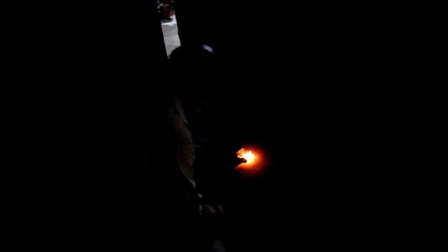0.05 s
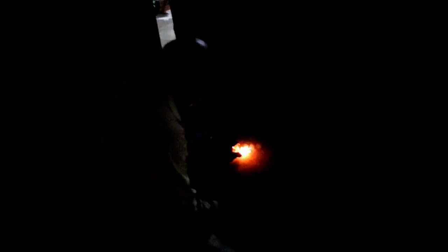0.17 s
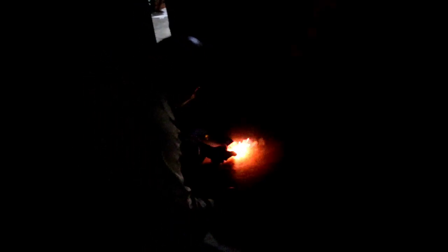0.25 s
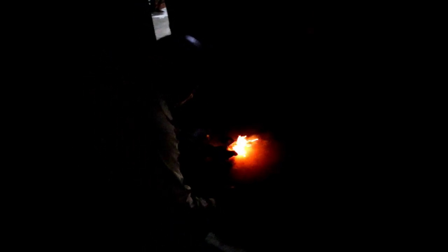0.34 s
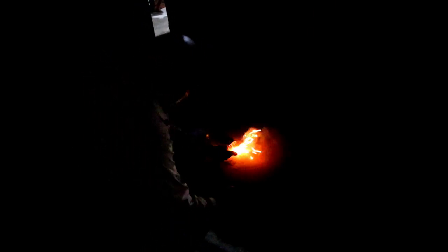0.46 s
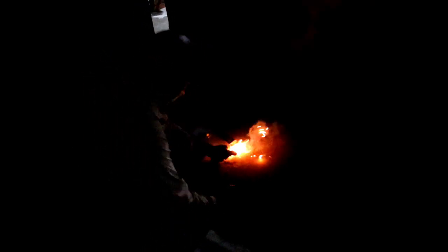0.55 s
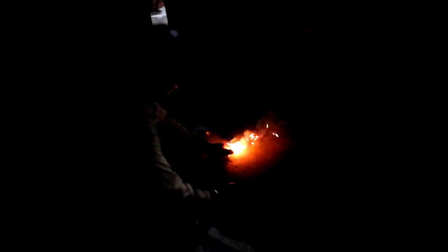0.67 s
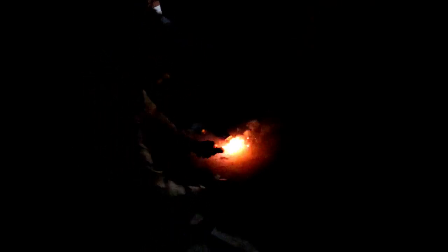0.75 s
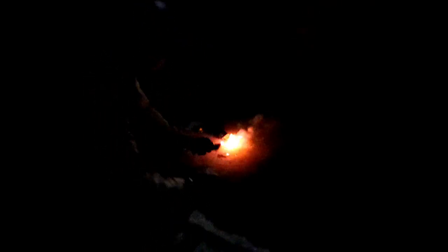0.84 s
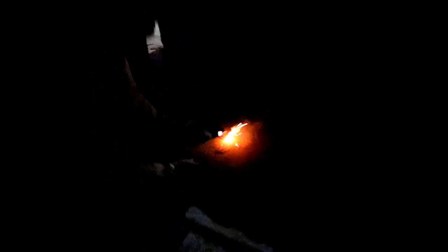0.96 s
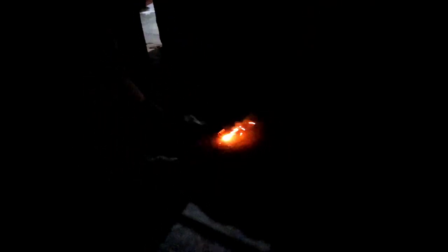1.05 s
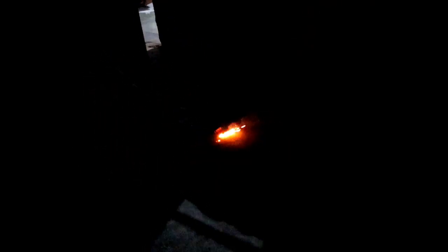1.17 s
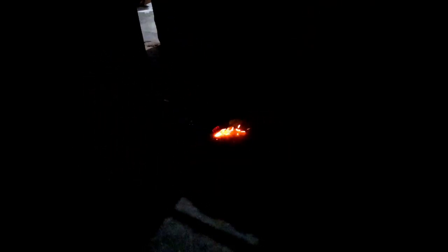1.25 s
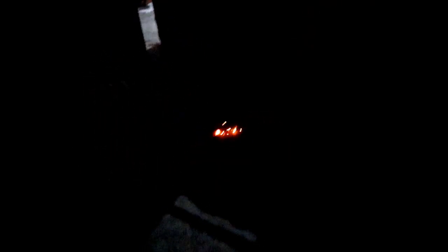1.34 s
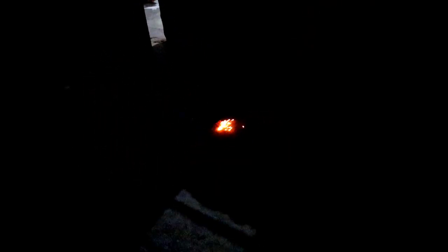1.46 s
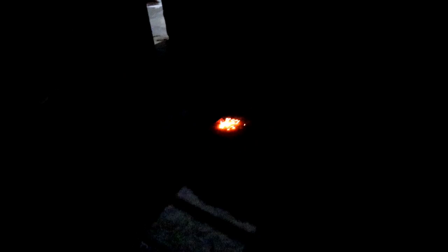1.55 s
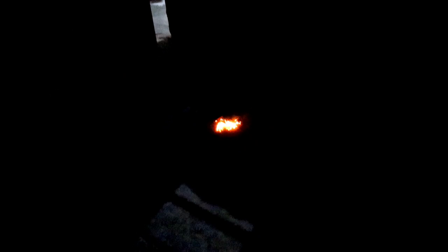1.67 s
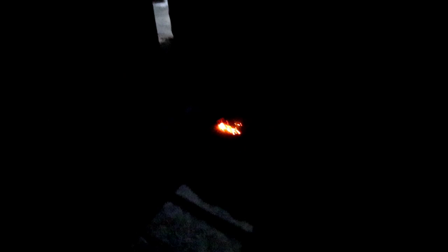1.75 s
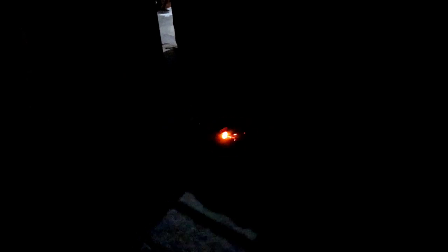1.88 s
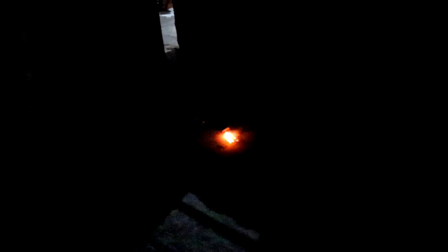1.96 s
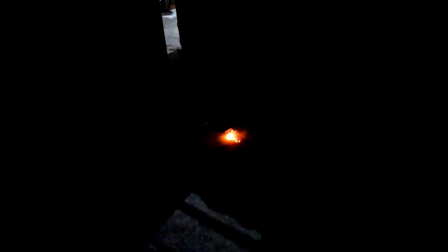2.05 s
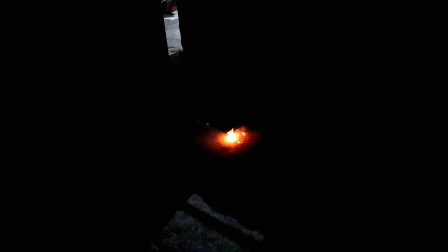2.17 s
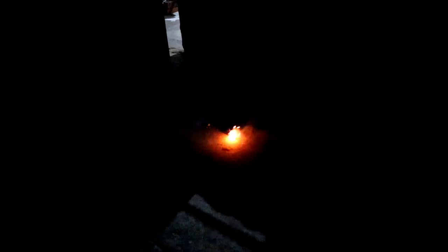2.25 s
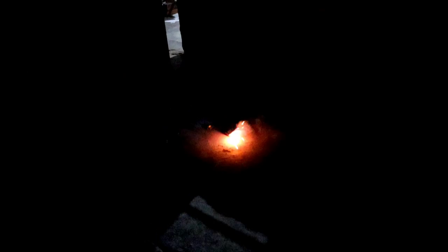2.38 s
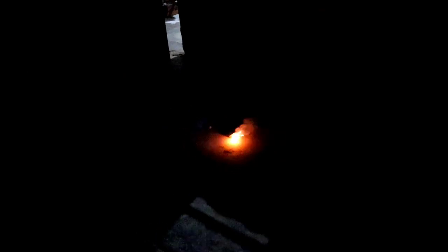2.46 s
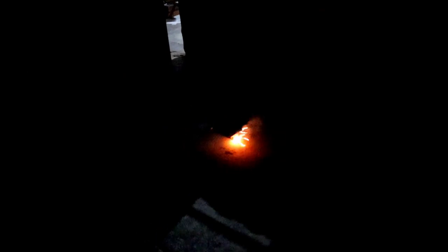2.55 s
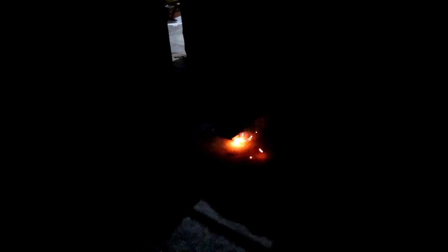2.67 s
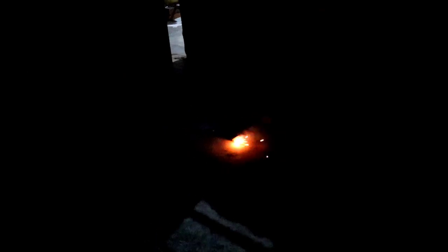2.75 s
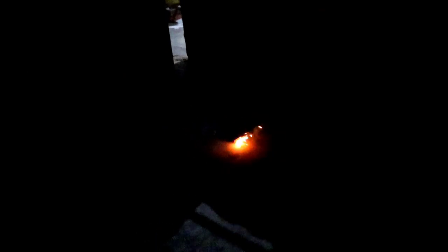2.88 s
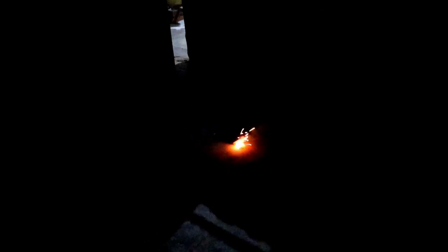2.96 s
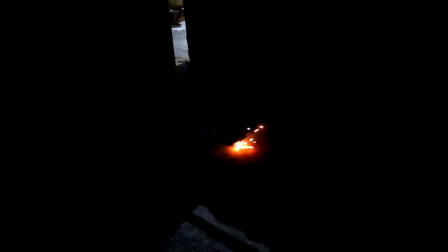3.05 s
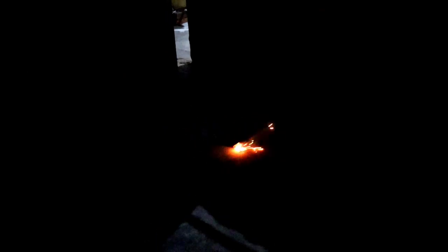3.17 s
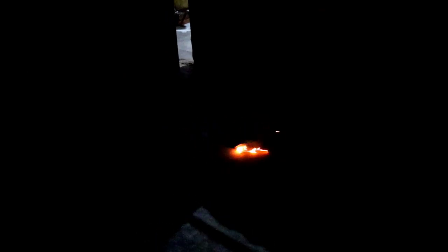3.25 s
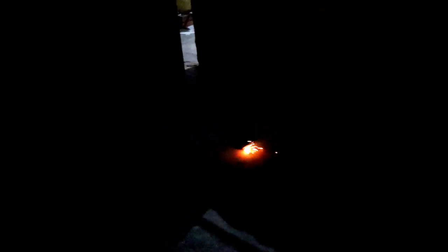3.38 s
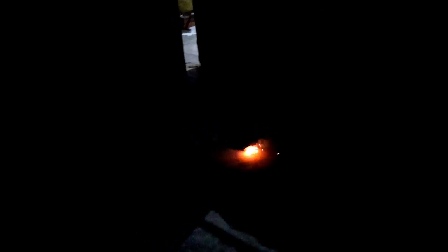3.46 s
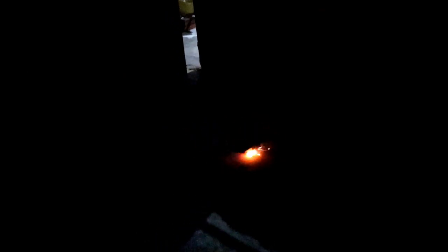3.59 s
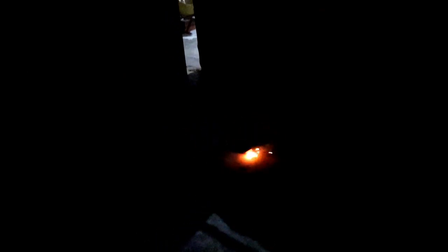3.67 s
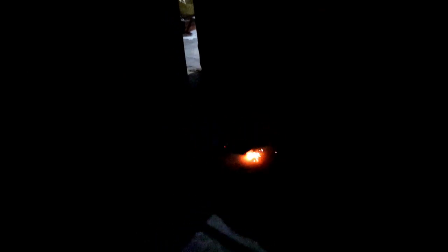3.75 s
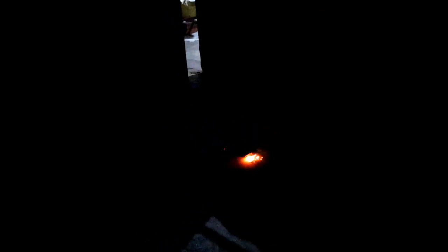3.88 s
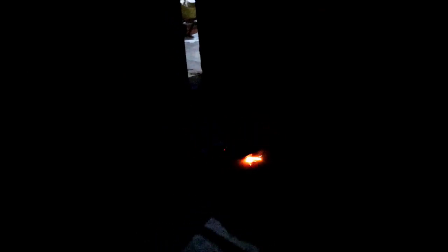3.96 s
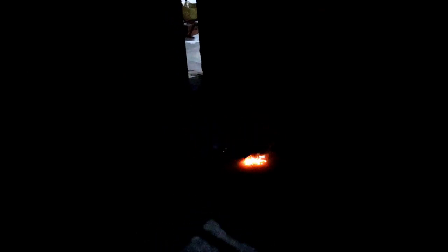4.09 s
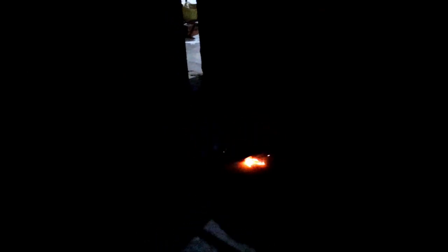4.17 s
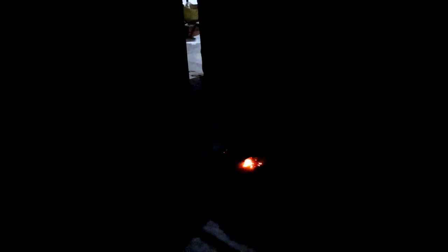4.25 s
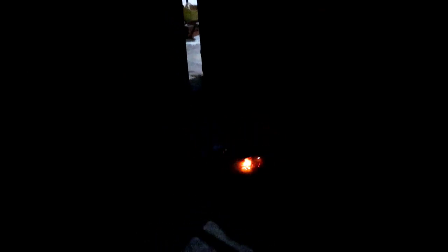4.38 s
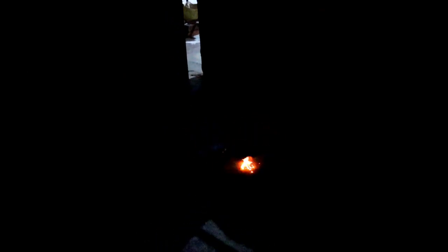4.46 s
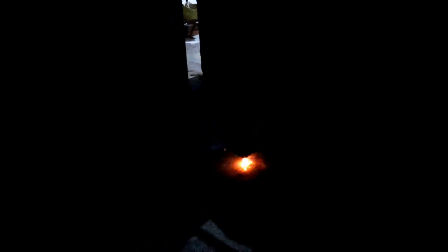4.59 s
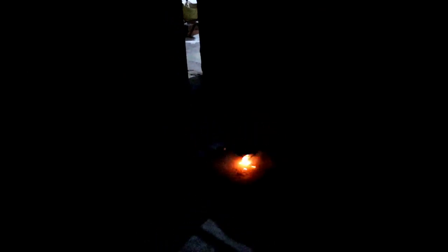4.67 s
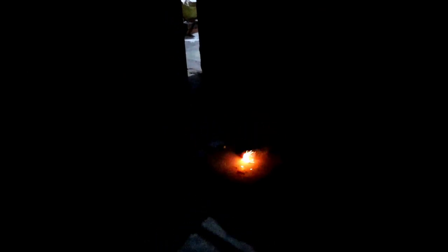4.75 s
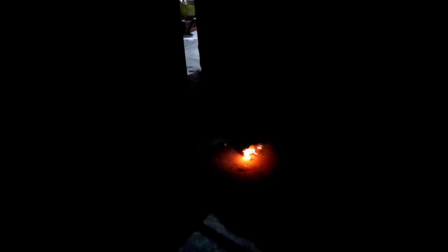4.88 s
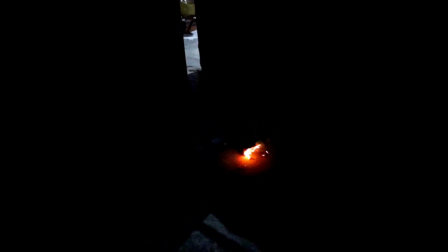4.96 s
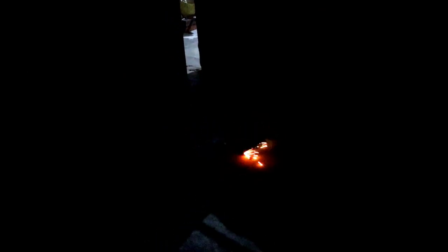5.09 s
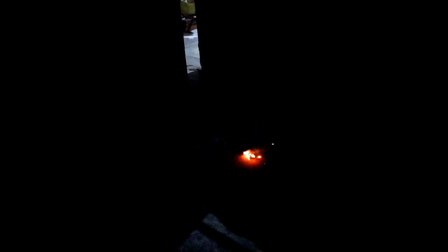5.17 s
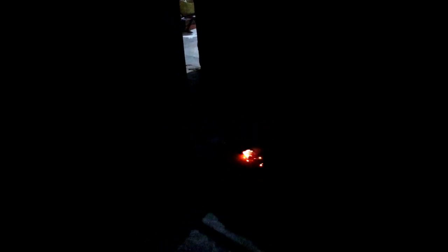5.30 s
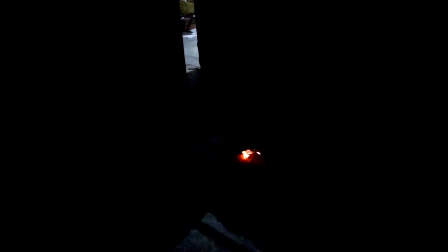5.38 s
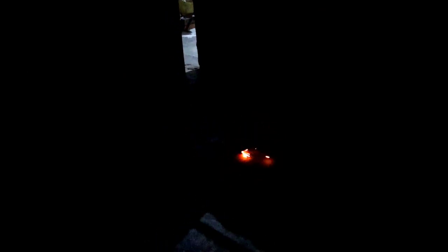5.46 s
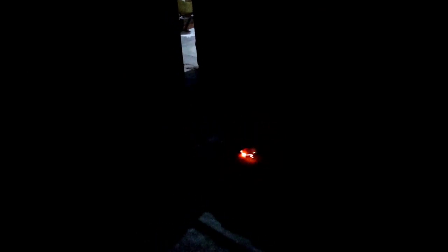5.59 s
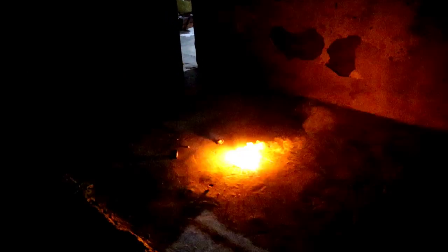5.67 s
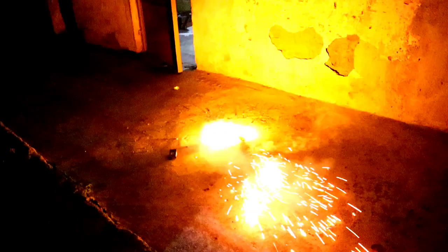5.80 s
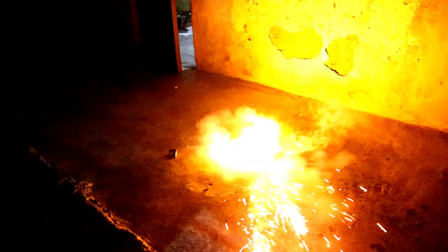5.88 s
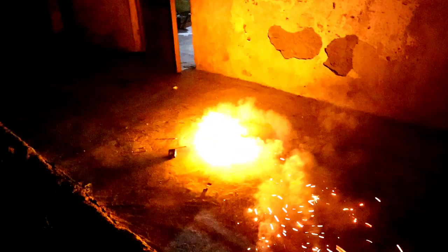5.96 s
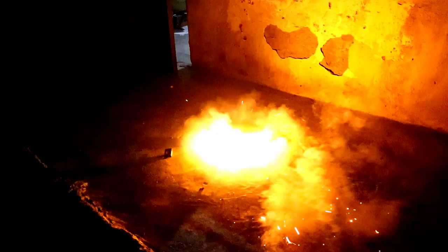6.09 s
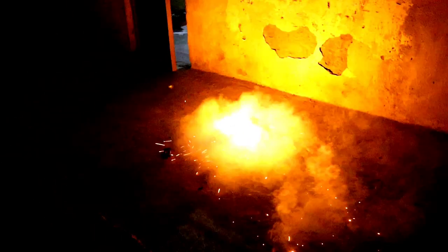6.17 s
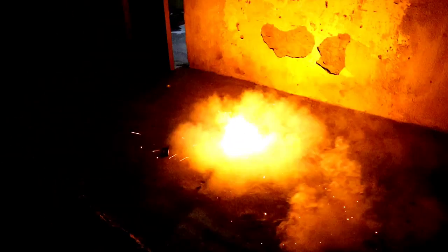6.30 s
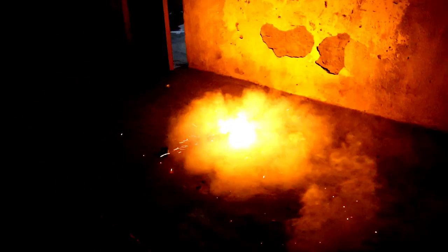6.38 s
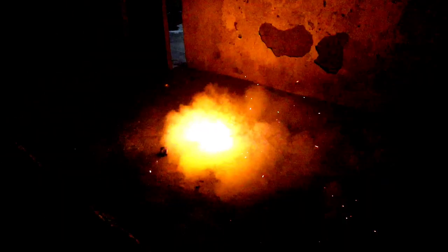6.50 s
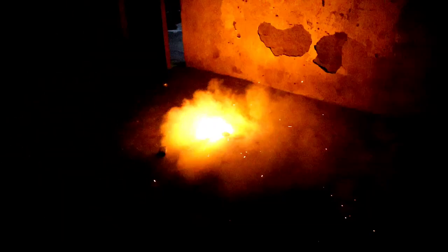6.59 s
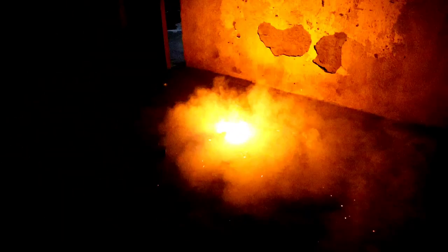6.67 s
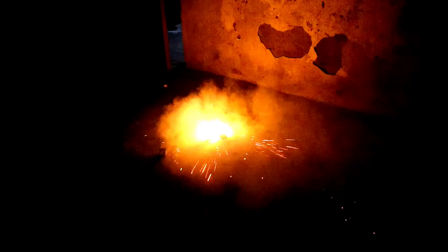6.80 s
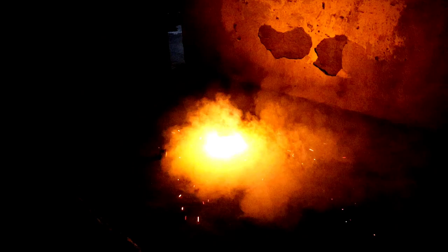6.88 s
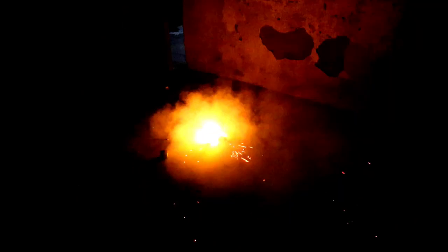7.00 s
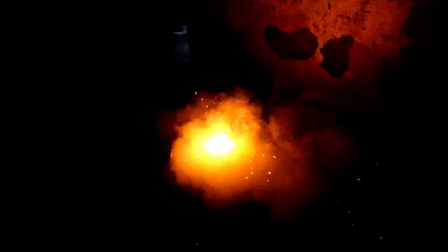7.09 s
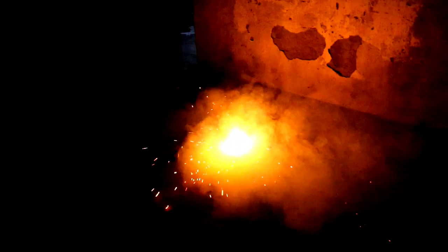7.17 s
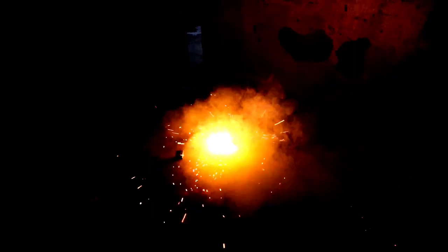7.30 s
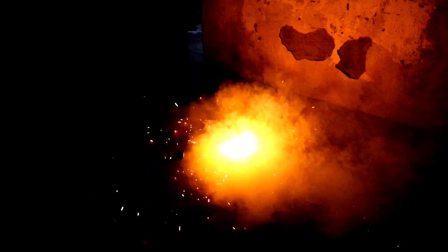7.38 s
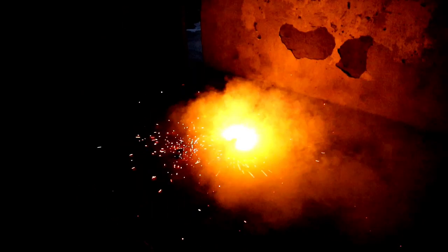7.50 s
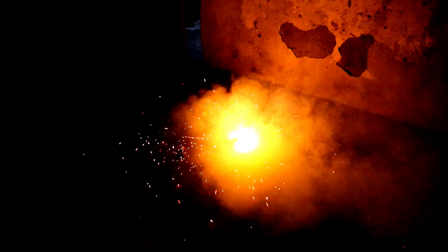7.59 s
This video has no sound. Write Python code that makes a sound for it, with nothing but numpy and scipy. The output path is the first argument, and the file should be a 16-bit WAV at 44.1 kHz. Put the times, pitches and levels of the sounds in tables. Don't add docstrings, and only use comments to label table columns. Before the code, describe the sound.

Steady, bright cricket trilling fills the stereo field, with faint background rumble and rustle. Close shoe knocks and gritty scuffs come early, then sparse dull thuds and small taps. A sudden tight crack and pop starts a piercing firework whistle, near centre, sinking in pitch and slowly weakening to the end. Wall echoes make it rough and wavering over hissing gas; the handheld camera's automatic gain ducks the night ambience.

```python
import sys
import numpy as np
from scipy import signal
from scipy.fft import rfft, irfft, next_fast_len
from scipy.io import wavfile
from scipy.ndimage import uniform_filter1d, map_coordinates

SR = 44100
rng = np.random.default_rng(int(sys.argv[2]) if len(sys.argv) > 2 else 0)


def int16_out(signal):
    q = np.round(np.clip(np.atleast_2d(signal).T, -1, 1) * 32767)
    wavfile.write(sys.argv[1], SR, q.astype(np.int16))


def ratio_of_db(decibels):
    return 10 ** (np.asarray(decibels, float) / 20)


N = 336904
T = np.arange(N) / SR

LIT_S = 5.777
SOUND_SPEED = 343
ARM_M = 0.033

# frequency in Hz, side over mid in dB.
WIDTH = [(30, -38), (100, -11), (300, -2.5), (800, -1.5), (1300, 0), (2300, 0), (3400, 3), (5000, 7.5),
         (8000, 10), (12000, 6)]


def unit(x):
    return x / np.sqrt(np.mean(x ** 2) + 1e-20)


def along(points, hz):
    f, v = np.transpose(points)
    return np.interp(np.log(hz + 1), np.log(f + 1), v)


def curves(rows, off=-120):
    seconds, *columns = np.transpose(rows)
    return [np.interp(T, seconds, column, off, off) for column in columns]


def wobble(rate, channels=1):
    knots = int(N * rate / SR) + 4
    return np.array([map_coordinates(rng.standard_normal(knots), [T * rate]) for _ in range(channels)])


def filtered(x, response):
    m = next_fast_len(N + SR // 4)
    return irfft(rfft(x, m) * response(np.fft.rfftfreq(m, 1 / SR)), m)[..., :N]


def spread(pair, spectrum, width):
    mid, side = filtered(pair, lambda hz: ratio_of_db(along(spectrum, hz) + [0 * hz, along(width, hz)]))
    return np.array([mid + side, mid - side]) / np.std(mid)


def patchy(db):
    z = signal.stft(rng.standard_normal((2, N)), nperseg=512)[2]
    field = uniform_filter1d(rng.standard_normal(z.shape[1:]), size=5, axis=0)
    field = uniform_filter1d(field, size=10, axis=1)
    return signal.istft(z * ratio_of_db(db * unit(field)), nperseg=512)[1][:, :N]


def echoes(x, t60):
    t = T[:SR // 3]
    tail = rng.standard_normal((2, len(t))) * ratio_of_db(-60 * t / t60)
    return signal.fftconvolve(x[None], tail / np.linalg.norm(tail[0]), axes=1)[:, :N]


def hits(rows, modes_of, side_db):
    out, t = np.zeros((2, N + 4096)), T[:4096]
    f = np.fft.rfftfreq(4096, 1 / SR)
    for s, db, *tone, t60 in rows:
        body = 0
        for k, (centre, w, g) in enumerate(modes_of(*tone)):
            body = body + (-1) ** k * ratio_of_db(g) * 1j * f * w / (centre ** 2 - f * f + 1j * f * w)
        blow = rng.standard_normal((2, 4096)) * ratio_of_db(-60 * t / t60)
        blow[:, 0] += 12
        mid, side = irfft(rfft(blow) * body)
        peak = ratio_of_db(db) / np.abs(mid).max()
        side = ratio_of_db(side_db) * side
        out[:, round(s * SR):][:, :4096] += peak * np.array([mid + side, mid - side])
    return out[:, :N]


def nozzle_shift(hz, angle):
    return 2 * np.pi * hz * ARM_M / SOUND_SPEED * np.sin(angle)


def arrivals(turn, hz, spin):
    # extra path to the left port in metres,
    # to the right port in metres, bearing from the hub in degrees, left level in dB, right level in dB.
    paths = [(-0.013, 0.008, 360.0, -1.0, -2.0), (0.207, 0.303, 295.0, -16.0, -15.0),
             (1.229, 1.226, 145.0, -18.0, -17.0), (1.492, 1.498, 263.0, -19.0, -13.0),
             (2.199, 2.231, 14.0, -26.0, -14.0), (2.237, 2.247, 134.0, -20.0, -18.0),
             (2.586, 2.568, 283.0, -17.0, -23.0), (3.975, 3.965, 252.0, -18.0, -20.0),
             (4.605, 4.604, 78.0, -22.0, -19.0), (4.946, 4.956, 159.0, -25.0, -20.0),
             (5.674, 5.677, 138.0, -27.0, -13.0), (7.759, 7.755, 292.0, -31.0, -16.0),
             (8.362, 8.346, 160.0, -26.0, -17.0), (11.15, 11.1, 80.0, -22.0, -17.0),
             (13.158, 13.24, 62.0, -15.0, -27.0), (14.551, 14.544, 273.0, -15.0, -15.0),
             (20.844, 20.801, 249.0, -32.0, -19.0), (21.451, 21.429, 171.0, -27.0, -18.0)]
    walls_db, beam_depth = 3.2, 0.3
    ports, late = np.zeros((2, N), complex), T > LIT_S
    t, turn, hz, spin = T[late], turn[late], hz[late], spin[late]
    for k, (left, right, bearing, *db) in enumerate(paths):
        facing = spin - np.radians(bearing)
        phase = turn + nozzle_shift(hz, facing)
        beam = 1 + beam_depth * np.cos(facing)
        for port, metres in enumerate((left, right)):
            sent = t - metres / SOUND_SPEED
            wave = np.interp(sent, t, beam, 0) * np.exp(1j * np.interp(sent, t, phase))
            ports[port, late] += ratio_of_db(db[port] + walls_db * (k > 0)) * wave
    return ports


def catch(s, db, t60):
    rise_s, choke_s = 0.00052, 0.015
    t = (T - s).clip(0, .05)
    return ratio_of_db(db - 60 * t / t60) * (1 - np.exp(-t / rise_s)) * np.exp(-(t / choke_s) ** 4)


def whistle():
    # time in seconds, frequency in Hz.
    pitch = [(5.798, 3182), (5.804, 3300), (5.835, 3545), (5.98, 3442), (6.36, 3193), (6.85, 2978),
             (7.01, 2939), (7.45, 2713), (7.64, 2656)]
    # time in seconds, tone in dB, brightness in dB.
    burn = [(5.796, -57, -13), (5.802, -5, 4.5), (5.818, -9, -11.5), (5.834, -19, 5), (5.86, -10, 3),
            (6.3, -11, 1.5), (6.7, -13, 2.2), (7.1, -17.5, -1), (7.64, -19.5, -2)]
    # time in seconds, turns done.
    wheel = [(5.7, 0.39), (6.11, 1.95), (6.335, 4.4), (6.515, 5.79), (6.722, 8.76), (6.908, 11.96),
             (7.11, 15.85), (7.352, 21.13), (7.68, 27.82)]
    # start in seconds, peak in dB, 60 dB decay in seconds.
    sputter = [
        (5.7765, -4.5, .2),
        (5.792, 1.2, .045),
    ]
    # frequency in Hz, level in dB per Hz.
    jet_colour = [(20, -13.5), (100, -18.5), (300, -10.5), (480, -14.5), (850, -6), (1200, -11), (2000, -3),
                  (3000, -3), (4500, -11.5), (7000, -14.5), (10500, -16.5), (12000, -22.5), (13500, -33)]
    # frequency in Hz, side over mid in dB.
    jet_width = [(60, -21), (500, -17), (1200, -13.5), (2500, -1), (5000, -20), (12000, 10)]

    level, bright = curves(burn)
    since = (T - LIT_S).clip(0)
    flare = 21.5 * np.exp(-since / 0.0076)
    hiss = np.where(T > LIT_S - .002, -43 - 2 * since + flare, -120)
    spin = 2 * np.pi * uniform_filter1d(curves(wheel, None)[0], size=3969)
    hz = curves(pitch, None)[0] + 1.1 * wobble(60)[0]
    swing = nozzle_shift(hz, spin)
    turn = 2 * np.pi * np.cumsum(hz) / SR
    pan = np.outer([.5, -.5], -5 - 1.5 * since)

    tone = ratio_of_db(level + pan) * np.real(arrivals(turn, hz, spin))
    turn = turn + swing
    tone += sum(catch(*row) for row in sputter) * np.cos(turn)

    skirt = unit(filtered(rng.standard_normal((2, N)), lambda f: 1 / (1 + (f / 120) ** 2) ** 0.81))
    upper = level + 2.1 * bright
    for k, db in ((2, level + bright - 23), (3, upper - 30), (4, upper - 52)):
        fading = .6 + wobble(90, channels=2) + 1j * wobble(90, channels=2) + 0.55 * skirt
        behind = 1 + 0.34 * np.exp(-2j * k * swing)
        tone += ratio_of_db(db - 4) * np.real(fading * np.exp(1j * k * turn) * behind)
    tone += ratio_of_db(-23) * echoes(tone.mean(axis=0), t60=.3)
    tone += ratio_of_db(hiss + 12) * skirt * np.sin(turn)

    jet_level = hiss + 0.92 * wobble(40) + 0.5 * np.cos(spin)
    return tone + ratio_of_db(jet_level) * spread(patchy(db=0.5), jet_colour, jet_width)


def ignition():
    # start in seconds, peak in dB, 60 dB decay in seconds.
    blasts = [
        (5.755, -35, 0.021),
        (5.7715, -9.5, 0.012),
        (5.7745, -0.5, 0.039),
        (5.778, 4, 0.028),
        (5.79, -13.5, 0.011),
    ]
    # frequency in Hz, width in Hz, level in dB.
    burst = [(208, 85, 7), (755, 133, 6.5), (1450, 500, 3.5), (2360, 560, 1.5), (2900, 660, 4),
             (8000, 5800, -30)]
    return hits(blasts, lambda: burst, side_db=-15.5)


def strokes(rows, shape):
    t = T[::32]
    total = 0
    for s, db, rise, fall in rows:
        away = np.where(t < s, (s - t) / rise, (t - s) / fall).clip(0, 5)
        total = total + ratio_of_db(db - 20 * away ** shape)
    return np.interp(T, t, total)


def feet():
    # time in seconds, peak in dB, rise in seconds, fall in seconds.
    scuffs = [(.915, -44, 0.0094, 0.071), (1.17, -34.5, 0.11, 0.086), (1.24, -41.5, 0.067, 0.062),
              (1.527, -39.5, .008, 0.15), (1.83, -43.5, 0.092, .16), (1.99, -47, 0.076, 0.077),
              (2.15, -44.5, .14, 0.067), (2.225, -46.5, 0.088, 0.033), (2.9, -51.5, .2, 0.35),
              (3.15, -57, 0.16, .15), (3.24, -53, 0.091, 0.11)]
    # frequency in Hz, level in dB per Hz.
    grit = [(300, -12), (800, -9.5), (1300, -8), (2100, -1.5), (3300, -4.5), (5000, -4), (8000, -13),
            (10500, -15), (11500, -35)]
    # time in seconds, peak in dB, rise in seconds, fall in seconds.
    treads = [(1.83, -36, 0.068, 0.13), (2.944, -38, .13, .2), (3.136, -37, 0.074, .08),
              (3.208, -43, .06, .12), (3.31, -51, 0.12, .1), (3.956, -47.5, 0.054, .08),
              (4.042, -51, 0.018, 0.041), (4.45, -41.5, .07, 0.085), (4.52, -47.5, 0.14, 0.087),
              (5.078, -47, 0.12, 0.049)]
    # frequency in Hz, level in dB per Hz.
    heel = [(50, -32), (100, -1), (170, -3), (270, -2), (360, -12), (700, -11), (1300, -16), (2000, -34.5)]
    # start in seconds, peak in dB, low over middle in dB, high over middle in dB,
    # 60 dB decay in seconds.
    taps = [(.906, -18.5, -19, 7.5, 0.06), (1.5205, -9.5, 17.5, 7.5, 0.046), (1.5285, -7.5, -8.5, 2, 0.035),
            (1.537, -13, -3, 3, .035), (1.544, -27.5, 10, 6, .03), (1.853, -23, 0.5, 6.5, 0.024),
            (2.106, -15.5, 3.5, 3, 0.0096), (2.184, -18, -4, 5.5, 0.014), (2.866, -28, 2, -9, 0.019),
            (3.713, -26, -8.5, -8, 0.038), (4.04, -33, 16, -2, 0.018), (5.07, -28.5, 22, -4, 0.041),
            (5.104, -29, 13.5, 6, 0.043)]
    # frequency in Hz, width in Hz, level in dB.
    knock = [(220, 55, 4), (810, 120, 0), (1110, 320, -5.5), (1860, 860, -6), (2980, 2400, -14),
             (7000, 4600, -25.5)]

    grains = rng.standard_normal((2, N)) * ratio_of_db(1.9 * wobble(400))
    scrape = ratio_of_db(7.5) * strokes(scuffs, shape=1.5) * spread(grains, grit, WIDTH)
    rumble = spread(rng.standard_normal((2, N)), heel, WIDTH)
    thud = ratio_of_db(-1.66 + 1.5 * wobble(60)) * strokes(treads, shape=1.1) * rumble

    def tap_modes(low, high):
        return np.array(knock) + np.outer([low, 0, 0, high, high, high], [0, 0, 1])

    return scrape + thud + hits(taps, tap_modes, side_db=-16.5)


def crickets():
    # wing strokes per second, wander in strokes per second, level in dB.
    singers = [(96.02, .15, -24), (96.15, .3, -27), (94.9, .25, -30), (47.45, .15, -31)]
    # frequency in Hz, level in dB.
    wing = [(3000, -51.5), (3400, -30.5), (3700, -14.5), (4000, -2.5), (4200, 2), (4450, -7.5),
            (4750, -21.5), (5100, -34.5), (7000, -33), (7700, -33.5), (8300, -26.5), (8900, -42),
            (10000, -42.5)]
    clicks = ratio_of_db(-15.5) * patchy(db=-0.5)
    for rate, wander, db in singers:
        turn = 2 * np.pi * np.cumsum(rate + wander * wobble(rate=2.5)[0]) / SR + 0.00086
        train = unit(np.sin((int(11000 / rate) + .5) * turn) / np.sin(turn / 2))
        swell = 1.6 * wobble(3.6, channels=2)
        clicks += ratio_of_db(db + swell) * (echoes(train, t60=0.15) + 0.69 * train)
    level = -22.5 + 0.69 * wobble(12)
    return ratio_of_db(level) * spread(clicks, wing, WIDTH)


def night():
    # time in seconds, level in dB.
    air = [(0, -52.5), (1.6, -53.5), (2.7, -54.5), (5.75, -56.5)]
    # frequency in Hz, level in dB per Hz.
    night_colour = [(20, 5.5), (50, 9), (120, 1.5), (300, 0.5), (450, -5), (850, -1.5), (1200, -5),
                    (2500, -4), (5500, -6.5), (7100, -12), (9800, -3.5), (11200, -15.5), (12500, -4.5),
                    (13600, -40)]
    level = curves(air, None)[0] + 12 + 0.95 * wobble(7.3)
    return ratio_of_db(level) * spread(patchy(db=2.5), night_colour, WIDTH)


def gain_control():
    return ratio_of_db(-38.5 * np.clip((T - 5.772) / 0.044, 0, 1))


def scene():
    firework = (ignition() + whistle()) / gain_control()
    return firework + feet() + crickets() + night()


def roll_off(x):
    return signal.sosfilt(signal.butter(12, 13600, fs=SR, output="sos"), x)


def record(dry):
    x = dry * gain_control()
    x = x / (1 + np.abs(x) ** 12) ** (1 / 12)
    x = filtered(x, lambda hz: 1 / (1 + (hz / 15000) ** 12))
    return roll_off(x)


dry = scene()
out = record(dry)
int16_out(out)
```